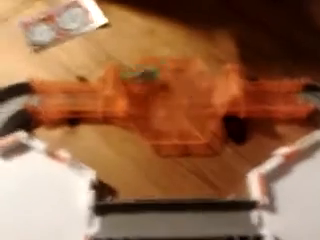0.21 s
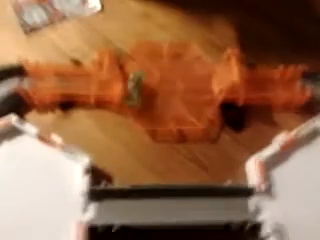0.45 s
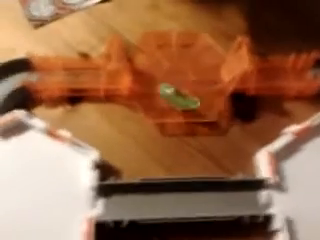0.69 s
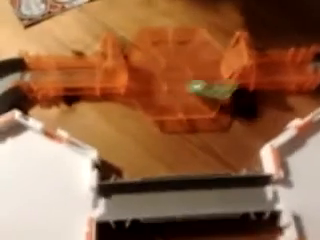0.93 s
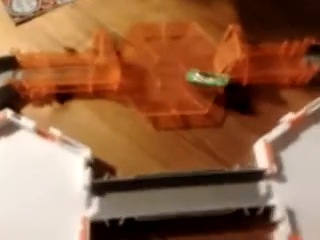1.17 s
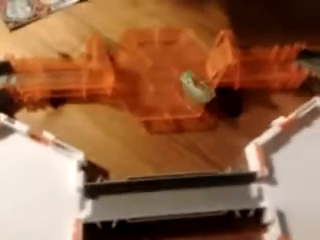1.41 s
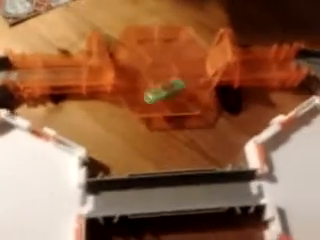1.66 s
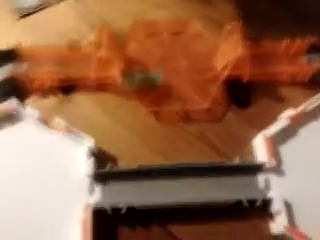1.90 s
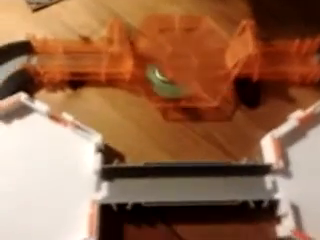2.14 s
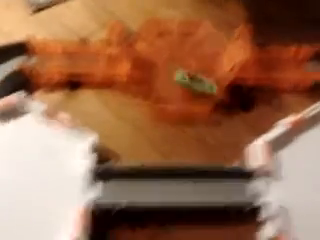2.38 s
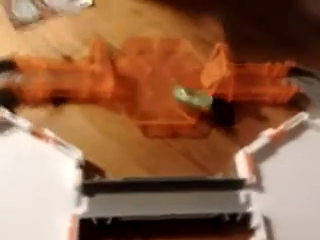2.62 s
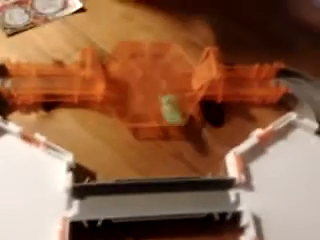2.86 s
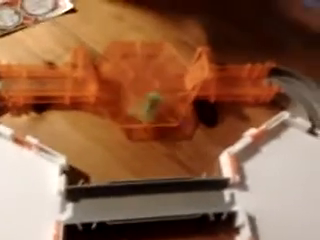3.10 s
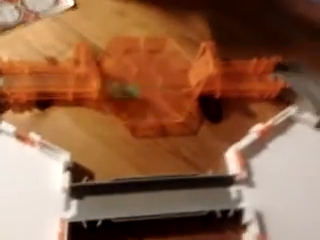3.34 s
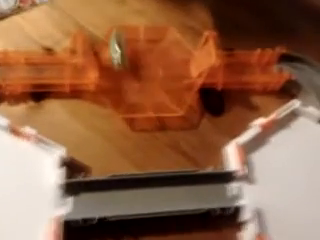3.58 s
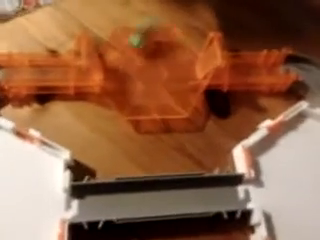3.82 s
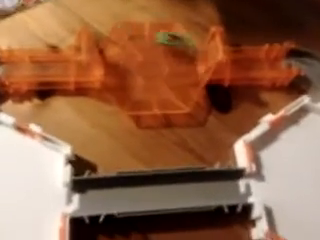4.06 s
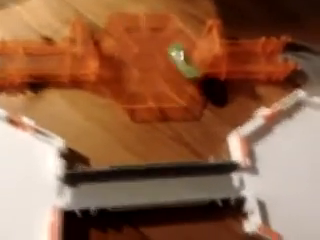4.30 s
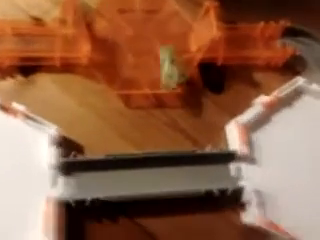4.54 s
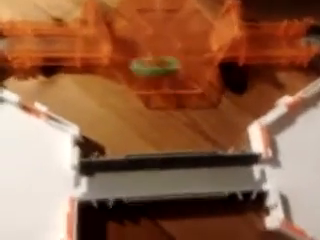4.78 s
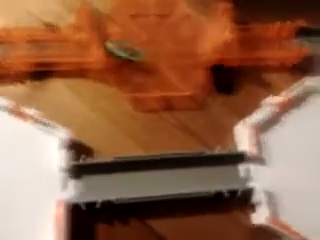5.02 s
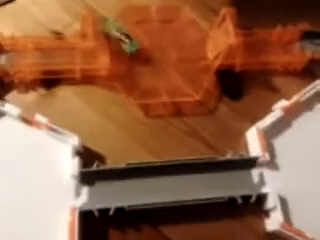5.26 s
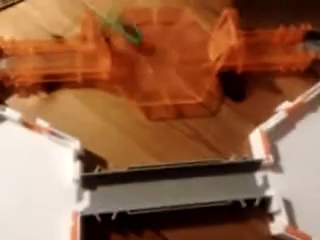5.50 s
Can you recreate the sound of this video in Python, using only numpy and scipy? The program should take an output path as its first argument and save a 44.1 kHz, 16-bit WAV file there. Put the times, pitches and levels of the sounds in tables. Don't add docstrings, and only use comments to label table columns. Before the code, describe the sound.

Fast dry rattling runs throughout, swelling in brief scuffles as small toy robots hop and bump. Loud plastic slams cluster early, then lighter knocks and taps fill the gaps, with two strong clacks near four and a half seconds. Wooden boards hum and thud underneath. Small room, close handheld camera, limited bandwidth, steady hiss, blurry compression around loud hits.

```python
import sys
import numpy as np
from scipy import signal
from scipy.fft import rfft, irfft, next_fast_len
from scipy.io import wavfile
from scipy.ndimage import uniform_filter1d, map_coordinates

SR = 44100
rng = np.random.default_rng(int(sys.argv[2]) if len(sys.argv) > 2 else 0)


def boost_factor(decibels):
    exponent = np.asarray(decibels, float) / 20
    return 10 ** exponent


def to_wav(s):
    ch = np.atleast_2d(s).T
    pcm = np.round(np.clip(ch, -1, 1) * 32767)
    wavfile.write(sys.argv[1], SR, pcm.astype(np.int16))


N = 248283


def unit(x):
    return x / np.sqrt(np.mean(x ** 2) + 1e-20)


def along(points, hz):
    f, v = np.transpose(points)
    return np.interp(np.log(hz + 1), np.log(f + 1), v)


def curves(rows):
    s, *cols = np.transpose(rows)
    return [np.interp(np.arange(N) / SR, s, c) for c in cols]


def wobble(rate):
    knots = rng.standard_normal(int(N * rate / SR) + 4)
    return map_coordinates(knots, [np.arange(N) * rate / SR])


def filtered(x, response):
    m = next_fast_len(N + SR // 2)
    return irfft(rfft(x, m) * response(np.fft.rfftfreq(m, 1 / SR)), m)[..., :N]


def mode(f, hz, width):
    return 1j * f * width / (hz * hz - f * f + 1j * f * width)


def placed(rows, times):
    at = np.round(np.asarray(times) * SR).astype(int)[:, None] + np.arange(rows.shape[1])
    return np.bincount(at.clip(0).ravel(), rows.ravel(), N + SR)[:N]


# f/Hz, width/Hz, level/dB
ARENA_MODES = [(918, 317, -13.5), (974, 147, -0.5), (1108, 223, -6), (1734, 351, -4), (1986, 204, -3),
               (2546, 140, -8), (2807, 452, -6.5), (3530, 660, -9), (4530, 560, -12), (5460, 790, -18.5),
               (6646, 600, -11.5), (7050, 1200, -16)]
PART_BORDERS = [700, 1300, 2550, 5000, 7600]


def arena_ring(f, lo, hi):
    return sum((-1) ** k * boost_factor(db) * mode(f, hz, 1.34 * width)
               for k, (hz, width, db) in enumerate(ARENA_MODES) if lo < hz < hi)


# t/s, level/dB
LEG_BUSTLE = [(0.0, -48.5), (0.31, -45.5), (0.59, -49), (0.82, -48), (1.05, -44.5), (1.24, -41.5),
              (1.52, -46.5), (1.77, -46.5), (2.05, -42.5), (2.57, -50.5), (2.81, -39.5), (3.62, -48),
              (4.09, -43.5), (4.19, -43), (4.8, -49), (5.31, -44.5), (5.52, -44.5), (5.63, -63)]
# t/s, peak level/dB
SCUFFLES = [(0.026, -26), (0.212, -28), (0.478, -31.5), (0.62, -23.5), (1.001, -37.5), (1.175, -29),
            (1.355, -20.5), (1.958, -30.5), (2.178, -30.5), (2.342, -39.5), (2.506, -32.5), (2.555, -28.5),
            (2.586, -26), (2.613, -31), (2.678, -27), (2.708, -35), (3.095, -29.5), (3.148, -26),
            (3.414, -26), (3.786, -43), (3.85, -25.5), (3.98, -23.5), (4.052, -29.5), (4.111, -24),
            (4.151, -19.5), (4.87, -29), (4.994, -29), (5.096, -20.5), (5.234, -31), (5.334, -29)]


def patter():
    bustle_db, = curves(LEG_BUSTLE)
    hops_per_s = 30
    count = int(N / SR * hops_per_s)
    late, luck = rng.random(count), rng.standard_normal(count)
    hop_s = (np.arange(count) + late) / hops_per_s
    hop_db = bustle_db[(hop_s * SR).astype(int)] - 3 + 1.5 * luck
    scuffle_s, scuffle_db = np.transpose(SCUFFLES)
    s = np.concatenate([hop_s, scuffle_s])
    swell_db = np.concatenate([hop_db, scuffle_db - 9])
    u = np.arange(SR // 20) / (0.0065 * SR)
    swell = placed(boost_factor(swell_db - 2.6)[:, None] * u * np.exp(1 - u), s - .003)

    clumps = boost_factor(2.5 * wobble(40) + 3 * wobble(120))
    tap_size = boost_factor(2.5 * rng.exponential(size=N).clip(0, 3.5))
    tapped = rng.random(N) < 1800 / SR
    taps = rng.standard_normal(N) * tap_size * tapped
    legs = unit(clumps * (unit(taps) + .5 * rng.standard_normal(N)))
    force = np.hypot(boost_factor(bustle_db - 2.5), swell)

    def ring(drive, lo, hi):
        response = lambda f: arena_ring(f, lo, hi)
        return filtered(drive * legs, response) / np.std(filtered(legs, response))

    body = ring(force, 0, PART_BORDERS[2])
    tick_force = force * boost_factor(-8.5 + 2.8 * wobble(4.4))
    return body + ring(tick_force, PART_BORDERS[2], PART_BORDERS[4])


# start t/s, length t/s, board f/Hz, swell level/dB
LINGERS = [(0, .08, 238, 8), (0.145, .3, 500, 8), (.75, 0.17, 188, 6), (1.054, 0.26, 188, 7),
           (1.907, .27, 238, 10.5), (2.13, 0.21, 500, 6.5), (2.26, 0.072, 188, 8), (2.654, 1.4, 131, 5.5),
           (3.85, 0.31, 238, 6.5), (4.038, 0.25, 500, 6), (4.705, .28, 188, 6), (5.008, 0.42, 238, 6),
           (5.473, .2, 131, 8)]


def lingering(hz):
    t = np.arange(N) / SR
    edge_s = 0.06
    return sum(db * np.clip(np.minimum(t - s, s + length - t) / edge_s + .5, 0, 1)
               for s, length, board_hz, db in LINGERS
               if abs(np.log(board_hz / hz)) < np.log(10) / 20)


# f/Hz, width/Hz
BOARD_MODES = [(131, 13), (188, 11), (238, 8.4), (500, 110)]
BOARD_LEVELS = [-66.5, -65, -63.5, -62]
# f/Hz, width/Hz, level/dB
QUIET_MODES = [(348, 30, -67), (389, 45, -63.5), (88, 50, -73.5)]
# t/s, peak level/dB
THUDS = [(0.02, -44), (0.196, -43), (0.851, -46), (1.049, -49), (1.194, -47), (1.357, -42.5), (1.641, -42),
         (1.928, -42), (1.976, -61), (2.041, -49), (2.149, -41), (2.545, -45), (2.946, -46), (3.038, -44),
         (3.281, -44), (3.328, -45.5), (3.855, -45), (3.91, -44), (4.133, -41.5), (5.095, -43),
         (5.307, -48), (5.368, -51)]


def boards():
    def shake(hz, width):
        return unit(filtered(rng.standard_normal(N), lambda f: mode(f, hz, width)))

    moving = 0
    for db, (hz, width) in zip(BOARD_LEVELS, BOARD_MODES):
        level = boost_factor(db + lingering(hz) + 2.2 * wobble(18))
        hum = shake(hz, width)
        hum = hum / np.abs(signal.hilbert(hum)) ** .55
        moving = moving + level * unit(hum)
    s, thud_db = np.transpose(THUDS)
    hops = placed(boost_factor(thud_db + 37.0)[:, None], s)
    thuds = filtered(hops, lambda f: mode(f, 180, 85) - 1.62 * mode(f, 464, 190))
    quiet = sum(boost_factor(db + 3.3 * wobble(2.1)) * shake(hz, width) for hz, width, db in QUIET_MODES)
    return moving + thuds + quiet


# f/Hz, level/dB per Hz
HISS_COLOUR = [(12, -46), (20, -8.5), (59, -11), (214, -1), (618, -11.5), (988, -9), (1230, -5.5),
               (1970, -9.5), (2290, -24.5), (2530, -11), (5560, -20), (6780, -11.5), (7300, -23),
               (9490, -50), (16100, -120)]


def room_tone():
    drift = boost_factor(wobble(7))
    hiss = filtered(rng.standard_normal(N), lambda f: boost_factor(along(HISS_COLOUR, f)))
    return boost_factor(-55.5) * drift * unit(hiss)


# t/s, peak level/dB, hollow level/dB, plate level/dB, bright level/dB
SLAMS = [(0.0406, -20, -31.5, -32.5, -44), (0.1999, -13, -31, -35.5, -24),
         (0.402, -14.5, -34.5, -20, -29.5), (0.409, -14, -32.5, -36, -48), (0.5804, -8.5, -36, -19, -28),
         (0.5834, -6.5, -32.5, -16.5, -30.5), (0.5905, -30, -29.5, -45.5, -44),
         (0.8789, -18.5, -35, -36.5, -45), (1.057, -14, -33, -30, -44.5), (1.1146, -19.5, -35, -33, -47.5),
         (1.3643, -13, -29, -33, -43), (1.5335, -17, -33.5, -17.5, -30), (1.5945, -17, -34, -26.5, -43.5),
         (1.6654, -17.5, -28, -28.5, -37.5), (2.794, -18, -38.5, -35, -53),
         (2.8769, -16.5, -35, -32, -50.5), (3.497, -19, -30.5, -34.5, -36.5),
         (3.5311, -15.5, -29.5, -23.5, -33), (3.927, -13.5, -31, -28.5, -38),
         (4.4232, -7, -32.5, -23.5, -28), (4.4632, -6.5, -33, -14, -22), (5.1144, -18.5, -31, -20, -31),
         (5.3091, -13, -35.5, -26, -30), (5.455, -11.5, -31, -24.5, -33)]
# t/s, peak level/dB, hollow level/dB, plate level/dB
KNOCKS = [(0.2037, -17.5, -32.5, -32), (0.5157, -24.5, -45, -40), (0.5405, -21, -38, -33),
          (0.6857, -22, -37.5, -38), (0.704, -25.5, -39, -40.5), (0.81, -30, -38, -42.5),
          (0.8577, -20, -38, -37), (1.146, -24.5, -39, -42.5), (1.2043, -24.5, -46.5, -37.5),
          (1.3066, -21, -36, -35), (1.4192, -20.5, -35.5, -36.5), (1.489, -19.5, -35, -34.5),
          (1.5336, -31.5, -28.5, -22), (1.6477, -14, -43, -30), (1.6866, -22.5, -37, -32.5),
          (1.9947, -27, -41, -41.5), (2.0043, -23, -38.5, -36), (2.1524, -30, -32, -47),
          (2.648, -26.5, -42.5, -33), (2.6664, -27.5, -36, -31.5), (2.7742, -21.5, -33.5, -32),
          (2.8311, -17, -31.5, -29.5), (2.9538, -20.5, -34.5, -31.5), (3.048, -20, -36, -34),
          (3.4293, -25.5, -42, -42.5), (3.5085, -21, -39, -32.5), (3.6535, -21.5, -35.5, -37),
          (4.038, -18.5, -41, -32.5), (4.3813, -23, -38.5, -43), (4.8174, -19, -33, -36)]
# t/s, peak level/dB, hollow level/dB
TAPS = [(1.0762, -20.5, -46), (1.0961, -27, -38), (1.255, -26, -45), (1.2813, -22.5, -34.5),
        (1.4501, -22.5, -39), (1.5544, -26, -34.5), (1.6545, -23.5, -27.5), (1.7111, -20.5, -32),
        (1.8469, -28.5, -34), (1.9307, -31.5, -40), (2.0534, -24.5, -40), (2.307, -26.5, -37),
        (2.803, -27, -39), (2.8469, -28, -37.5), (2.8617, -21, -35.5), (2.9003, -21, -37.5),
        (2.929, -23.5, -39), (2.9694, -23.5, -37), (3.11, -29, -51.5), (3.239, -25.5, -41),
        (3.274, -23.5, -44.5), (3.351, -25.5, -38.5), (3.6097, -23.5, -36), (3.663, -20.5, -34.5),
        (3.72, -25, -39), (4.2378, -27.5, -41), (4.6087, -27.5, -40), (4.8275, -32, -40.5),
        (4.9013, -31, -38.5), (5.1582, -20.5, -36.5)]


def blows():
    def light(rows, under_db):
        return np.array(rows)[:, 1:2] + under_db + 1.5 * rng.standard_normal((len(rows), 1))

    plate_under_db, bright_under_db = -13, -25.5
    knocks = np.hstack([KNOCKS, light(KNOCKS, bright_under_db)])
    taps = np.hstack([TAPS, light(TAPS, plate_under_db), light(TAPS, bright_under_db)])
    s, db, hollow_db, plate_db, bright_db = np.vstack([SLAMS, knocks, taps]).T[..., None]
    return s, db, hollow_db + 7 - db, plate_db + 10 - db, bright_db + 13 - db


def clacks():
    s, db, hollow_db, plate_db, bright_db = blows()
    size = 4096
    t, f = np.arange(size) / SR, np.fft.rfftfreq(size, 1 / SR)
    noise, spikes = rng.standard_normal((2, len(s), size))
    loose = boost_factor(-.2 * (db + 28.5))
    chatter_fade = boost_factor(-11.0 - 60 * t / 0.052) + boost_factor(-18.5 - 60 * t / 0.054)
    chatter = loose * noise * boost_factor(3 * spikes) * chatter_fade
    crack = 3.37 * (t == 0) + 0.73 * boost_factor(-60 * t / 0.0016) * noise
    blow = rfft(crack + chatter)
    luck = rng.standard_normal((len(ARENA_MODES), 2, len(s), 1))
    small_body = mode(f, 1390, 2700) ** 2 + 0.38 * mode(f, 4900, 6000)
    part_levels = [hollow_db + 0.09, -.6, plate_db + 0.13, bright_db + 0.19]
    rows = 0
    for lo, hi, part_db in zip(PART_BORDERS, PART_BORDERS[1:], part_levels):
        ring = 0
        for k, (hz, width, level_db) in enumerate(ARENA_MODES):
            if lo < hz < hi:
                gain = (-1) ** k * boost_factor(level_db + 1.7 * luck[k, 0])
                ring = ring + gain * mode(f, hz * (1 + 0.037 * luck[k, 1]), 1.72 * width)
        fade = boost_factor(-60 * t * hi / 600)
        part = (irfft(blow * ring * small_body, size) * fade)[:, :size * 3 // 4]
        peak = np.abs(part[:, :size // 16]).max(1)[:, None]
        rows = rows + boost_factor(db + part_db - 1.84) * part / peak
    return placed(rows, s[:, 0])


# f/Hz, t/s
ROOM_DECAY = [(300, 1), (1000, 0.19), (2600, 0.26), (4500, .13), (7000, 0.047)]


def room(x):
    hz, t, z = signal.stft(rng.standard_normal(SR // 3), SR, nperseg=256)
    fade = boost_factor(-60 * t / along(ROOM_DECAY, hz)[:, None])
    tail = signal.istft(z * fade, SR, nperseg=256)[1]
    late = np.pad(x, (150, 0))
    return signal.fftconvolve(late, tail / np.linalg.norm(tail))[:N]


# t/s, level/dB
BUMPS = [
    (1.899, -51),
]


def handling():
    s, db = np.transpose(BUMPS)
    push = np.hanning(SR // 6) * rng.standard_normal((len(s), SR // 6))
    rows = boost_factor(db)[:, None] * push
    return 14 * filtered(placed(rows, s - .08), lambda f: mode(f, 48, 50) ** 2)


def scene():
    floor = patter() + boards() + room_tone()
    hits = clacks()
    return (floor + hits + boost_factor(-12.5) * room(hits) + handling())[None]


FRAME_S = .064
LOW_RATE = 16000
# f/Hz, level/dB
VANISHING = [(500, -56.5), (1500, -22), (3500, -32.5), (7000, -34.5)]
# f/Hz, level/dB
ROUNDING = [(500, -35.5), (2000, -19), (7000, -14)]


def starved(x):
    lead = 176
    hz, t, z = signal.stft(np.pad(x, (lead, 0)), SR, nperseg=706)
    band = np.arange(len(hz)) // 7
    power = np.add.reduceat(np.abs(z) ** 2, np.arange(0, len(hz), 7))
    frame = ((t + FRAME_S - lead / SR) // FRAME_S).astype(int)
    frame_starts = np.searchsorted(frame, np.unique(frame))
    loudest = np.maximum.reduceat(power[3:].max(0), frame_starts)[frame - frame[0]]
    whim = uniform_filter1d(rng.standard_normal(power.shape), size=2, axis=1)
    limit_db = along(VANISHING, hz[::7])[:, None] - 2.3 + 6.6 * whim
    limit = loudest ** .92 * boost_factor(2 * limit_db)
    rounding = np.sqrt(power[band]) * np.exp(2j * np.pi * rng.random(z.shape))
    z = z + boost_factor(along(ROUNDING, hz))[:, None] * rounding
    return signal.istft(z * (power > limit)[band], SR, nperseg=706)[1][lead:N + lead]


BLIP_RUNS = [(0, 1), (6, 1), (10, 4), (24, 5), (31, 8), (41, 1), (43, 3), (47, 5), (56, 3), (64, 3),
             (69, 8), (79, 1), (86, 1)]


def blips(thin):
    frames = np.concatenate([first + np.arange(count) for first, count in BLIP_RUNS])
    s = .0568 + FRAME_S * frames
    level = np.sqrt(np.abs(uniform_filter1d(thin ** 2, size=SR // 50)))[(s * SR).astype(int)]
    t = np.arange(560) / SR
    scatter = boost_factor(-67.5 + 3 * rng.standard_normal(len(s)))
    gain = (level / np.median(level)) ** 1.03 * scatter
    puff = np.hanning(len(t)) * np.sin(np.pi * LOW_RATE * t)
    return placed(gain[:, None] * puff, s - .0025)


# f/Hz, level/dB
BAND_EDGE = [(20, 1), (7150, 1), (7350, -6.5), (7600, -58.5), (10000, -110), (22050, -150)]
# f/Hz, level/dB
MIRROR_BAND = [(8300, -99), (8700, -20.5), (9400, -54), (10000, -100)]


def camera(x):
    thin = filtered(starved(x), lambda f: boost_factor(along(BAND_EDGE, f)))
    mirror = 2 * thin * np.cos(2 * np.pi * LOW_RATE * np.arange(N) / SR)
    return thin + blips(thin) + filtered(mirror, lambda f: boost_factor(along(MIRROR_BAND, f)))


def top_cut(x):
    return signal.sosfilt(signal.butter(12, 8870, fs=SR, output="sos"), x)


def record(dry):
    mix = camera(dry[0])[None]
    return top_cut(mix)


dry = scene()
out = record(dry)
to_wav(out)
```